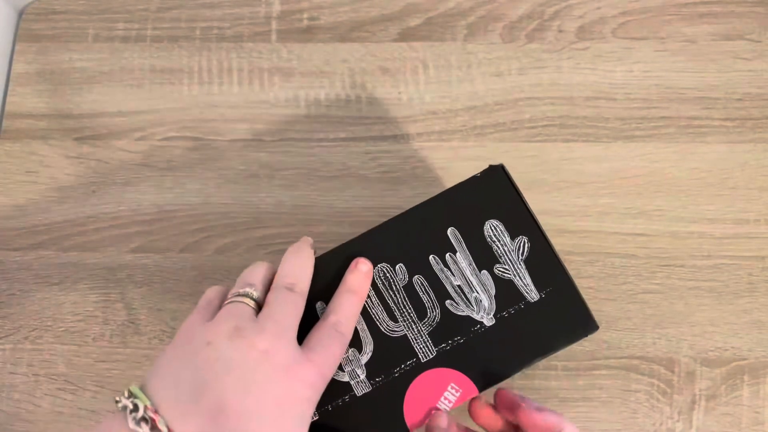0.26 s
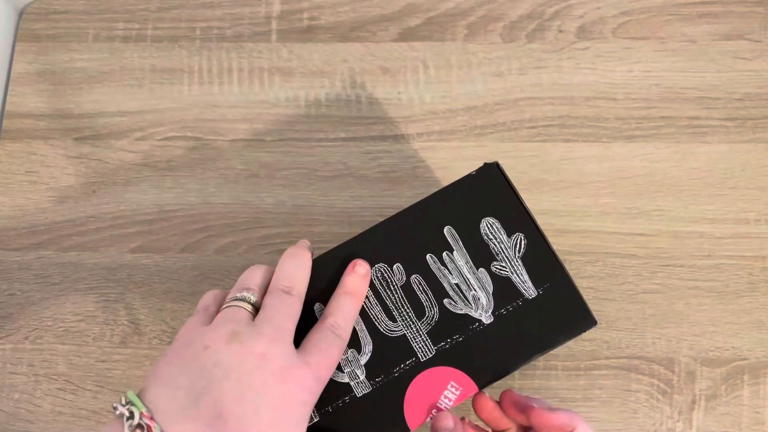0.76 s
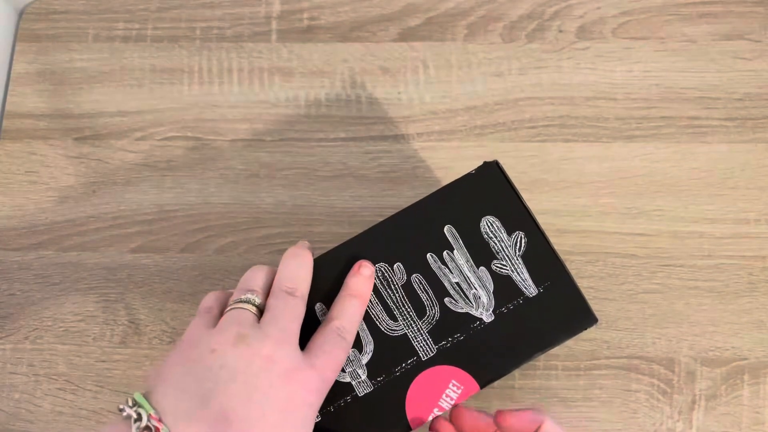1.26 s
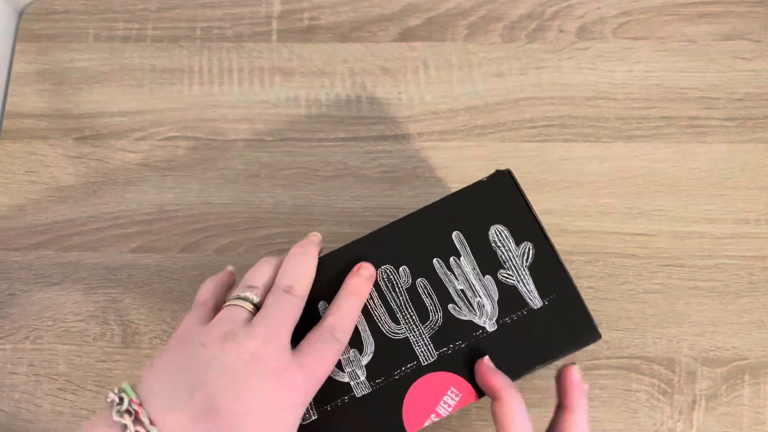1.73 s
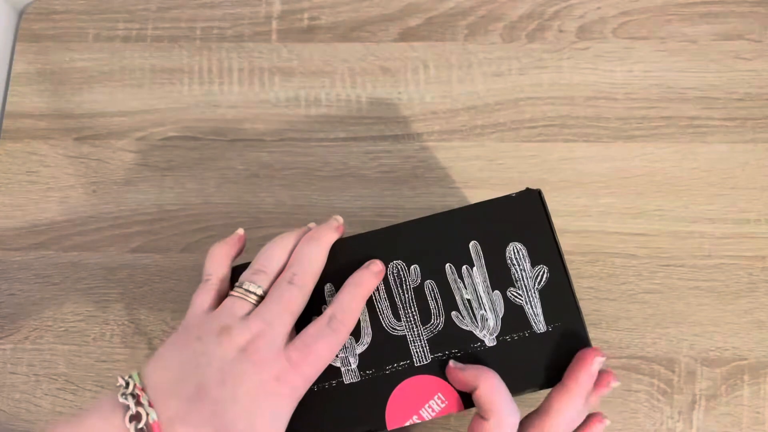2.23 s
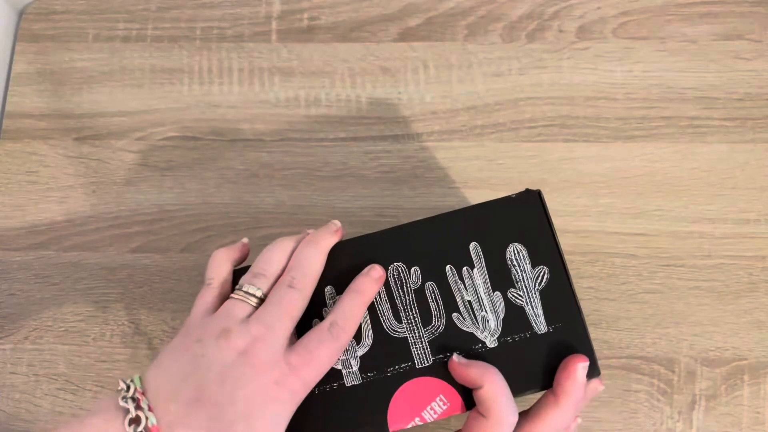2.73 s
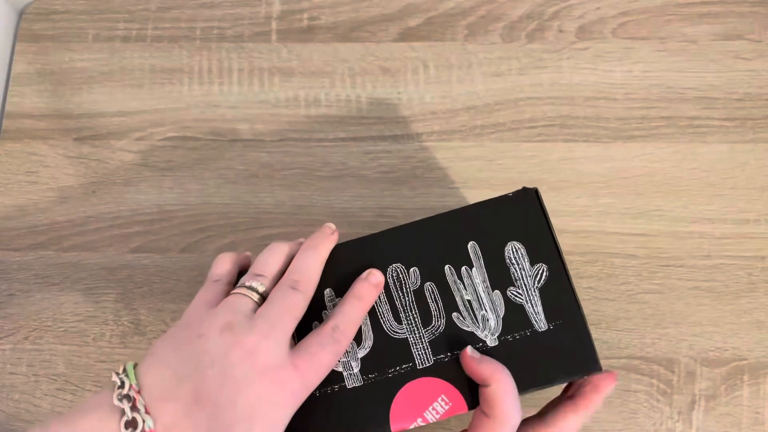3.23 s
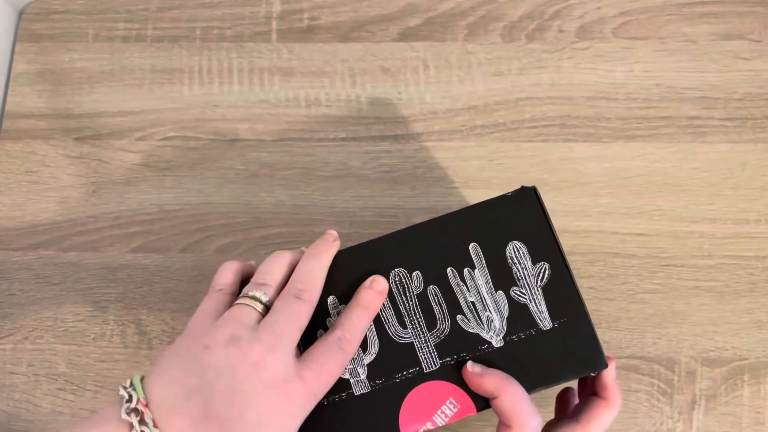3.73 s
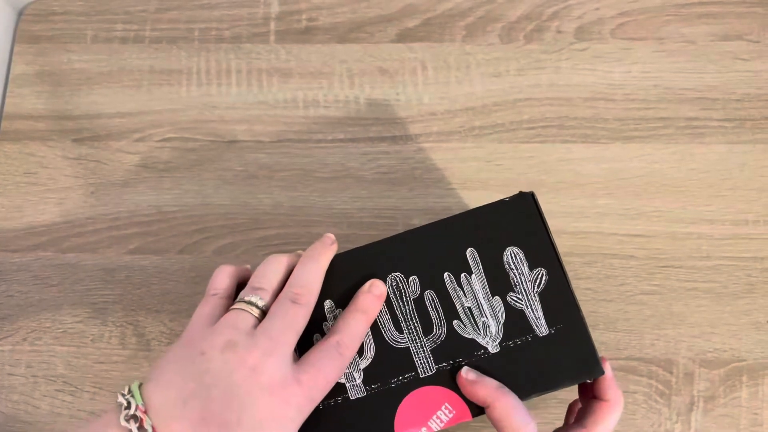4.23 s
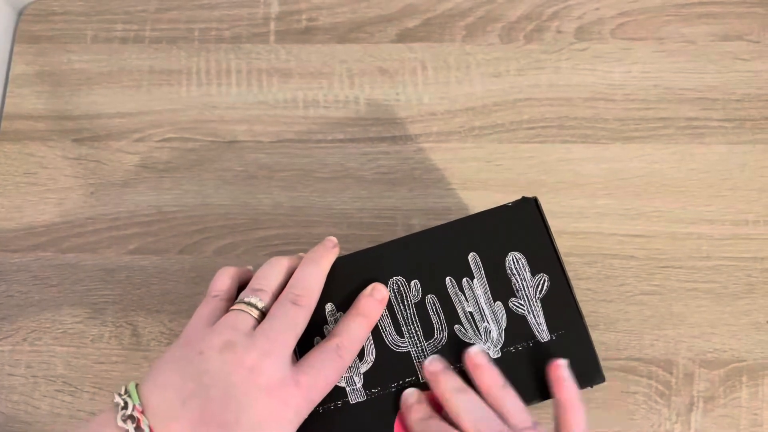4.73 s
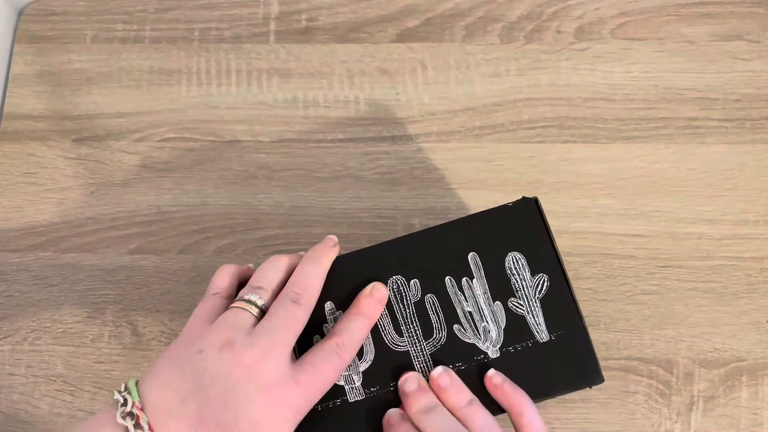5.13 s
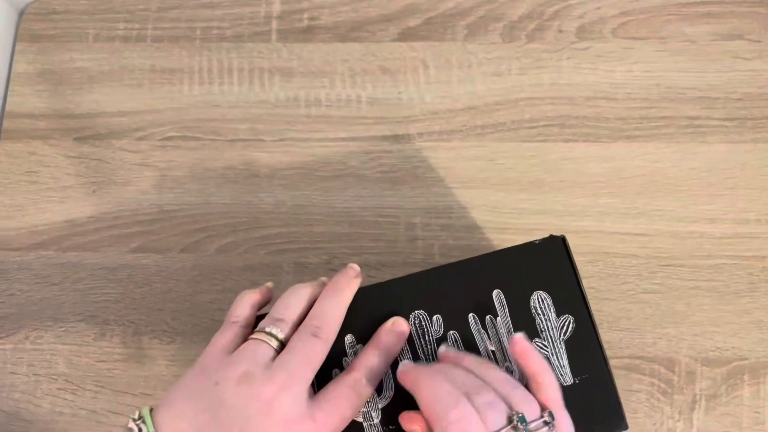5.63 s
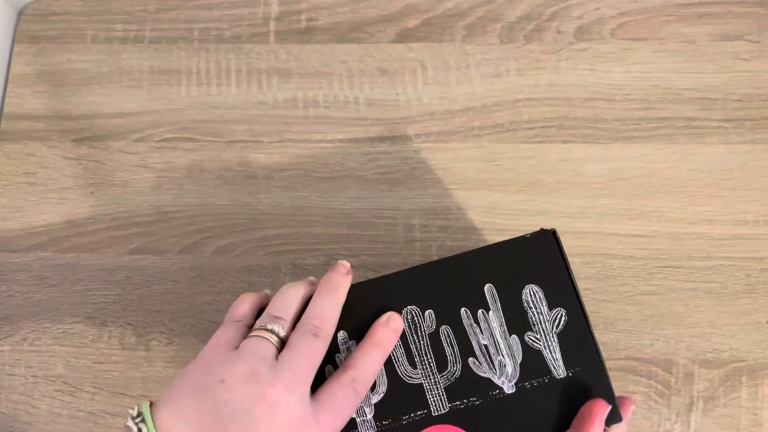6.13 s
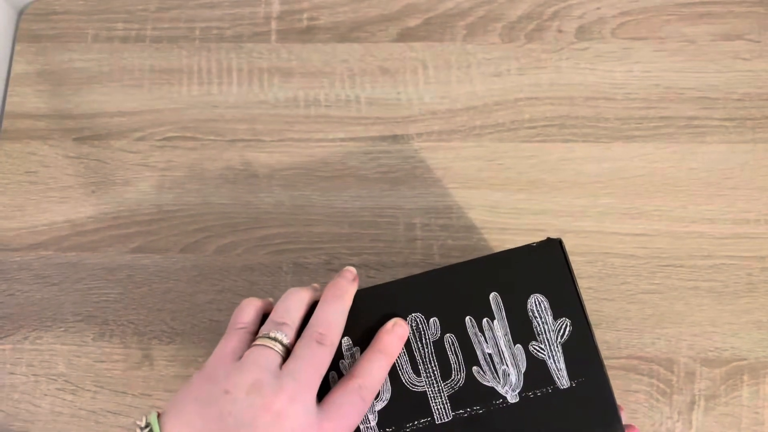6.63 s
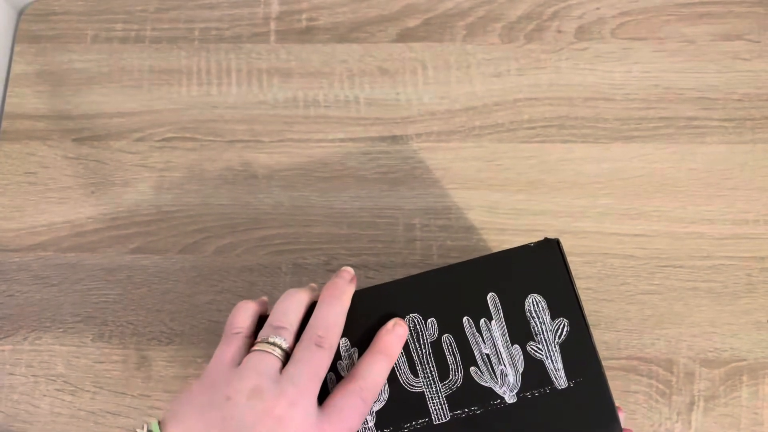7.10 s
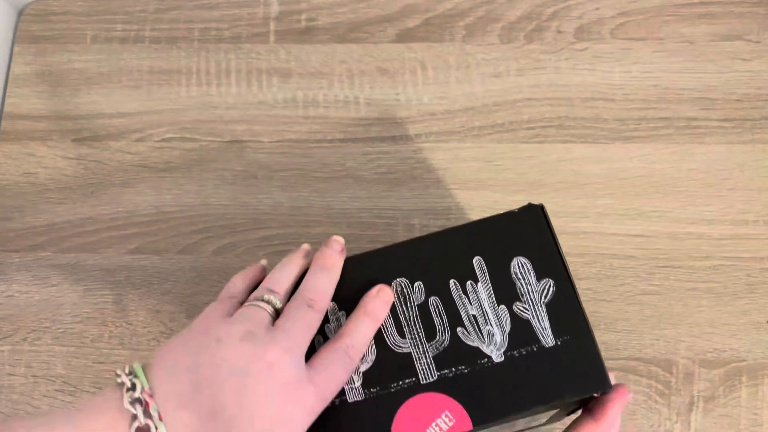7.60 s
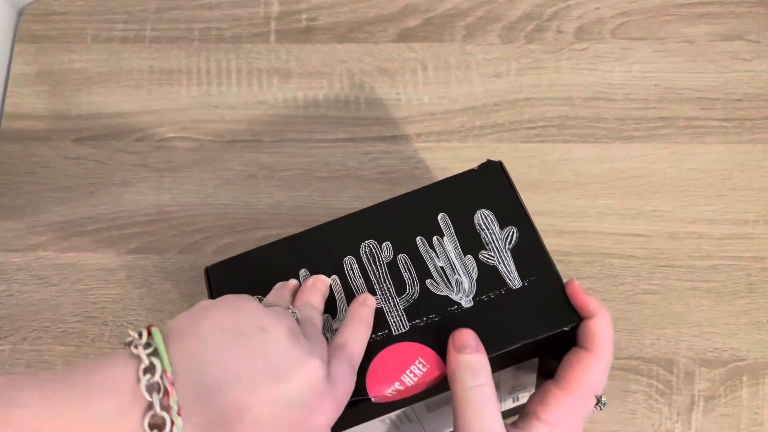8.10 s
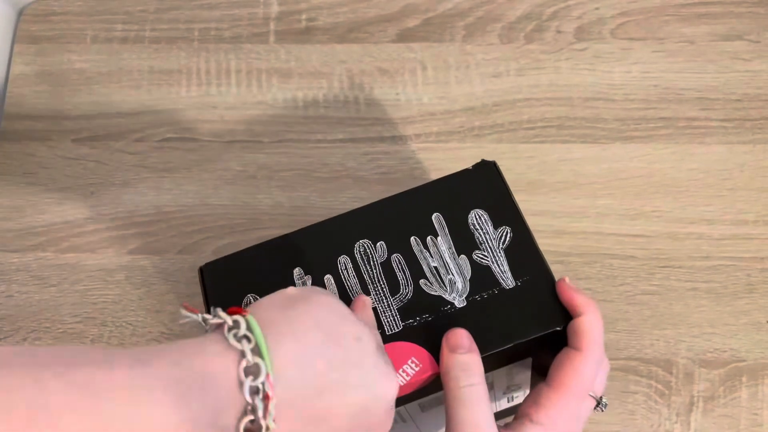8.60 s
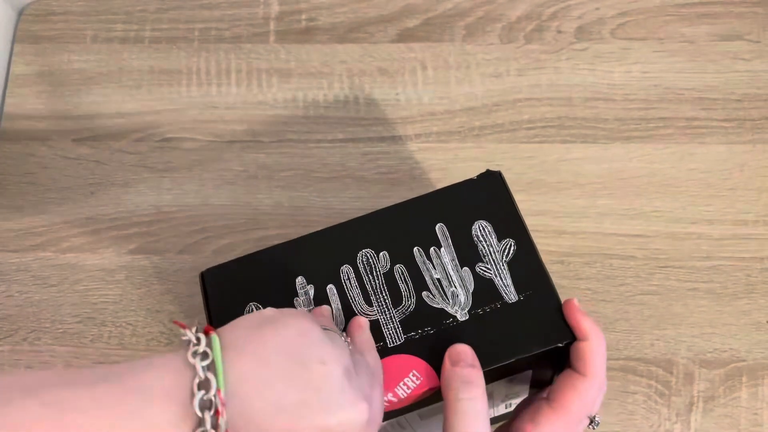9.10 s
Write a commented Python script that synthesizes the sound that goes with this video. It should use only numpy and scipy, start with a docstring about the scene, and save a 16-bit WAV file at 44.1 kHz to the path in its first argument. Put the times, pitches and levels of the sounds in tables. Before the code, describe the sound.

Close, dry nail ticks and skin rubs on a small card box on a table, one hard knock, then quieter fumbling and renewed picking.

```python
"""Fingernails pick at a sticker on a hollow cardboard box, on a table close below a two-port microphone.
Each slip or knock sends a chirping pulse and crackle through the card and rings the box's modes.
Skin hisses over the card, drives box and table, scrapes briefly and looses woody ticks; pushes and
drops of the box make the table top boom. Reflections and a short room tail answer.
Behind lie faint air noise and one thin steady tone."""
import sys
import numpy as np
from scipy import signal
from scipy.fft import rfft, irfft, next_fast_len
from scipy.io import wavfile
from scipy.ndimage import uniform_filter1d, map_coordinates

SR = 44100
rng = np.random.default_rng(int(sys.argv[2]) if len(sys.argv) > 2 else 0)


def bounce(signal):
    """Save signal as a 16-bit WAV file at the path given by the first command-line argument."""
    frames = np.transpose(np.atleast_2d(signal))
    limited = np.clip(frames, -1, 1)
    pcm = np.round(limited * 32767).astype(np.int16)
    wavfile.write(sys.argv[1], SR, pcm)


N = 412335

# nail slips on the card and knocks of the box: (time [s], snap reference level [dB], then relative to it:
# knock of the box [dB], upper ring of the box [dB], brightness [dB])
NAIL_SLIPS_AND_KNOCKS = [(0.9713, -39, -10.5, -19, -5), (1.147, -46.5, 2.5, -8, -12.5),
                         (1.164, -59, 6, -1, -25), (1.178, -57, 9.5, 0, -25), (1.3149, -38, -30, -29, -11),
                         (1.392, -60, -11, -13, -6), (1.415, -57, -6, -19, -4), (1.5601, -43, -8, -10, -21),
                         (1.5837, -45, -7, -7, -25), (1.915, -47.5, -2, -10, -12),
                         (2.0036, -50.5, -14, -23, -5), (2.0486, -41, -3.5, -17, -12.5),
                         (2.1087, -53.5, 7.5, 7.5, -20), (2.1778, -57.5, 12, -4, -7.5),
                         (2.3374, -47, -17, -17, -10), (2.354, -51, -5, 0, -25),
                         (2.3652, -46, -13, -6, -25), (2.392, -55, -8, 0, -22), (2.418, -53, -9, -2, -27),
                         (2.4071, -44.5, 2.5, -3, -26), (2.438, -45, -2, 0, -16), (2.485, -49, 1, -1, -18),
                         (2.501, -55.5, -3, -10, -8.5), (2.55, -56, -11, -19, -8),
                         (2.6196, -46, 8, -2, -13), (2.6369, -40, -3, -12, -10),
                         (2.675, -49.5, -5, -5, -18), (2.7275, -34, -12, -10.5, -25),
                         (2.7546, -35.5, -4.5, -12, -19), (2.7628, -39.5, -6, -6, -18),
                         (2.797, -32.5, -9, -13, -18.5), (2.824, -39, -6, -15, -17),
                         (2.830, -35, -6, -18, -15.5), (2.8566, -42, -18, -12, -13),
                         (2.8853, -39.5, -6, -23, -13.5), (2.9273, -46, 0, -11, -8),
                         (2.9485, -38.5, 5, -4, -19), (2.9895, -43, 9, 0, -19),
                         (3.0631, -45.5, 4.5, 0, -30), (3.122, -37.5, -9, -10, -8),
                         (3.141, -38.5, -3, -12, -25), (3.2185, -44, 11.5, 2.5, -20),
                         (3.2872, -35.5, -1.5, -8, -20), (3.4099, -29, -3, -3.5, -25),
                         (3.4394, -27, -6, -7.5, -21), (3.466, -22.5, -7, -8.5, -22.5),
                         (3.488, -25.5, -7, -3, -17), (3.5067, -22, -14, -6.5, -21.5),
                         (3.5392, -22.5, -6, -7.5, -21.5), (3.5987, -21, -8, -8.5, -19.5),
                         (3.687, -21, -6.5, -6, -17.5), (3.83, -27, -1.5, -3, -16),
                         (3.8629, -32.5, -1.5, -1, -16), (3.9066, -26, -9.5, -4.5, -19.5),
                         (3.974, -42, -2, 1, -26), (4.0082, -29, -4, -4, -16), (4.127, -60, 7, 4, -36),
                         (4.2157, -31, -9, -8, -18.5), (4.239, -31, -4.5, -5, -22),
                         (4.3826, -33.5, -11, -4, -21), (4.4452, -46.5, 10.5, -4, -10.5),
                         (4.578, -34.5, -12, -16, -22), (4.7116, -45.5, -0.5, -12, -17),
                         (4.797, -57.5, 14, 5, -23), (4.8428, -22.5, -17.5, -17.5, -25.5),
                         (4.9178, -26.5, -7.5, -9, -23), (4.954, -32, -10, -4, -21),
                         (4.9821, -19.5, -11.5, -17, -15.5), (5.0566, -33, -6.5, -18, -14),
                         (5.104, -52.5, 3, -13, -25), (5.1766, -38.5, -4, -7, -18.5),
                         (5.2003, -23, -21, -12.5, -19), (5.235, -15.5, -8.5, -14, -11.5),
                         (5.2905, -5, -7, -7.5, -23.5), (5.698, -54, -18, -14, -4),
                         (5.7202, -40, -8.5, -13, -16), (5.7466, -45, -13.5, -18, -6.5),
                         (5.8415, -35, -5, -14, -12), (5.9346, -47.5, -2, -11.5, -28.5),
                         (6.0215, -40.5, 1.5, -8.5, -19), (6.058, -37, -11, -27, -17),
                         (6.0908, -43, -2, -5, -11), (6.119, -51, 2, 1, -16), (6.1476, -51, 9, 4, -14),
                         (6.1702, -47.5, 2, -6, -15), (6.217, -46.5, 1, 3, -25), (6.2338, -49, 9, 5, -20),
                         (6.3105, -39, -1, -7, -20.5), (6.387, -40.5, 3.5, -3.5, -26),
                         (6.4016, -47, 8, 3, -16), (6.4158, -45, 7, 4, -20), (6.4285, -43, 11, 1, -24),
                         (6.445, -40.5, -3, 4, -21), (6.464, -29.5, -5, -1.5, -21),
                         (6.4825, -25.5, -8, -11, -20), (6.5087, -35, -0.5, 0, -17.5),
                         (6.541, -26.5, -4, -11, -20), (6.5837, -43, 0, -2, -30), (6.6003, -38, 4, -1, -20),
                         (6.6272, -42, 5, 4, -18), (6.6519, -40, 8.5, 4, -23.5),
                         (6.777, -47.5, 7, 4, -13.5), (6.794, -45.5, 8.5, -11, -23),
                         (6.8125, -41.5, 4.5, -1.5, -17.5), (6.836, -49.5, 11.5, 2.5, -19),
                         (6.9153, -63.5, 15, -2, -15), (6.9732, -30, -13.5, -9, -31.5),
                         (7.3027, -39.5, -1, -8.5, -10.5), (7.4434, -45.5, -18, -13, -8.5),
                         (7.4639, -32.5, -14, -10.5, -14.5), (7.5212, -44, 4.5, -2.5, -14),
                         (7.8239, -35, 2, 3, -14), (7.893, -32, 5.5, 3.5, -16.5),
                         (7.9364, -32, -1.5, -1, -16), (8.1549, -41.5, 13, 8.5, -16),
                         (8.1827, -34.5, 2, 0.5, -21), (8.2032, -32, 7.5, 3, -16),
                         (8.268, -41, -8, -5, -17), (8.378, -24.5, -4.5, -12, -23),
                         (8.4579, -32.5, 3.5, -11, -22.5), (8.5081, -21.5, -6.5, -12.5, -26),
                         (8.5406, -31, -2.5, -3.5, -22), (8.6467, -49.5, 13.5, 5, -34),
                         (8.6709, -40.5, -3, 5, -27), (8.7047, -28.5, -2.5, 1.5, -31),
                         (8.735, -22.5, -10, -4.5, -27), (8.7613, -22, -8, -4.5, -24),
                         (8.7862, -22, -10, -8.5, -23.5), (8.8125, -23, -8.5, -3.5, -21),
                         (8.8644, -20.5, -10, -5, -21), (8.9186, -20.5, -8, -7, -21.5),
                         (8.9914, -18, -12.5, -11.5, -25), (8.9987, -14, -13.5, -14.5, -4.5),
                         (9.0444, -19.5, -12.5, -8, -23), (9.0946, -37, -15, -15, -22),
                         (9.1477, -29, -24, -25, -24), (9.1681, -19.5, -12.5, -7.5, -27),
                         (9.1962, -40.5, -7.5, -5.5, -11), (9.3114, -35.5, -5, 2, -15),
                         (9.3444, -30.5, -14, -4, -18.5)]
# modes of the hollow box and of the table top: (frequency [Hz], level [dB], 60 dB decay time [s])
BOX_MODES = [(149, 5.5, 0.1), (223, 3, 0.077), (305.7, 0, 0.082), (355, 0.5, 0.16), (455.3, 0.5, 0.072),
             (549.6, -1.5, 0.08), (669.2, -3.5, 0.077), (794, -4.5, 0.09), (937, -14, 0.022),
             (1147, -11, 0.043), (1302, -10.5, 0.02), (1483, -25.5, 0.08), (2000, -16.5, 0.025),
             (2750, -22, 0.022)]
TABLE_MODES = [(52.96, 0.5, 0.74), (64.14, 1.5, .55), (112.3, -1.5, 0.38), (147, 1, 0.17), (176.4, 0, 0.17),
               (201, -7, 0.1), (350.5, 0, 0.2)]
# colour of the snap, its middle and top registers, and the bending pulse: (frequency [Hz], level [dB])
SNAP_COLOUR = [(500, -37.5), (1200, 5.5), (2000, 0), (3000, -1), (4200, -11), (6000, -29.5)]
SNAP_MID_COLOUR = [(2200, -49.5), (3400, -1.5), (4200, 2.5), (5000, -1), (7000, -3.5), (9000, -1),
                   (11000, -16), (13000, -35.5)]
SNAP_TOP_COLOUR = [(8000, -38.5), (10500, 3), (13500, 1.5), (15000, -7), (16500, -14.5)]
BENDING_COLOUR = [(250, -39), (450, 5), (750, -1), (1200, -11), (2000, -18.5), (3200, -33), (5000, -42)]
TICK_DB, RASP_DB = 13, 4  # offsets of the clean and the noisy part of the snap
THUD_DB, THUD_GROWS = -11.5, 0.82  # lowest box modes: offset, dB per dB of knock
TOP_DB, TOP_GROWS = 5, 1.7  # top treble: offset, dB per dB of brightness
PHASE_SCATTER = 0.45  # radians, from blow to blow

# ticks a second, level over the drone of the strokes [dB]
CRACKLE_RATE, CRACKLE_DB = 180, -6
# range of tick sizes [dB], lower and upper corners of their band [Hz]
CRACKLE_SPREAD_DB, CRACKLE_LOW_HZ, CRACKLE_HIGH_HZ = 16, 900, 2600

# strokes of skin over the card: (start [s], length [s], hiss [dB], fine treble over the hiss [dB],
# drone of the box [dB])
SKIN_STROKES = [(-.1, 0.49, -62.5, -5.5, -57), (1.282, 0.36, -70.5, -1, -95), (1.517, 0.43, -60, -5.5, -53),
                (1.852, 0.19, -66.5, -1.5, -57), (1.975, 0.21, -66.5, -1, -68),
                (2.163, 0.077, -77, -2, -63.5), (2.296, 0.22, -72, 1, -60), (2.498, 0.27, -62.5, -5, -58.5),
                (2.838, 0.7, -67.5, -11, -57.5), (3.405, .24, -78, -21, -46.5),
                (4.194, 0.17, -69.5, -3, -63), (4.346, 0.43, -62, -6, -60.5), (4.494, 0.3, -62.5, -1, -85),
                (4.826, 0.11, -59, -12, -54), (5.192, 0.16, -45.5, -19.5, -42),
                (5.285, 0.12, -46, -17.5, -38), (5.399, 0.13, -54, -6, -54), (5.454, 0.12, -67, 2, -52.5),
                (5.816, 0.25, -70.5, -3, -65), (5.993, 0.23, -63.5, -11, -71),
                (6.168, 0.18, -65.5, 0.5, -76), (6.356, 0.44, -88, -15.5, -61),
                (7.315, 0.5, -66.5, -4.5, -63), (7.56, 0.41, -56.5, -5, -60.5),
                (7.812, 0.12, -56, -7, -54.5), (7.866, 0.21, -58.5, -8, -49.5), (8, 0.27, -66.5, -5, -53.5),
                (8.134, 0.25, -61, -9, -54), (8.399, 0.43, -75, -21, -59.5), (8.667, 0.48, -68, -24, -50.5),
                (8.983, 0.18, -50, -30, -50), (9.16, .3, -81.5, -5, -75)]
RISE, FALL = 0.23, 0.7  # shares of a stroke's length spent swelling and fading
# the box resting under the hands: (time [s], drone of the box [dB], shudder of the table [dB])
HAND_PRESSURE = [(0.0, -58, -67), (0.36, -69, -58.5), (0.65, -73, -70.5), (0.95, -67.5, -61.5),
                 (1.12, -66.5, -72), (1.2, -66, -66), (1.3, -71, -57), (1.5, -64, -59.5), (1.64, -71, -51),
                 (1.78, -58, -45.5), (1.861, -66, -59.5), (2.24, -72, -59), (2.91, -59.5, -62),
                 (3.46, -64, -61), (3.64, -60.5, -55), (4.4, -66.5, -70), (5.28, -69.5, -56),
                 (5.42, -48, -61), (5.47, -82, -44), (5.58, -68, -41), (5.66, -85, -50.5),
                 (5.8, -76.5, -55.5), (5.86, -63, -59.5), (6.0, -72, -65.5), (6.22, -58, -72),
                 (6.3, -63, -66), (6.5, -57, -62), (6.72, -74, -57), (7.06, -74.5, -60),
                 (7.131, -87.5, -64), (7.2, -90, -79), (7.27, -69, -67), (7.34, -77, -63), (7.5, -74, -55),
                 (7.73, -62, -65), (7.87, -52, -45), (8.39, -55, -53.5), (8.72, -66, -53), (8.88, -72, -41),
                 (9.11, -64, -56), (9.35, -72, -64)]
# colour of the broad hiss and of its fine treble: (frequency [Hz], level [dB])
HISS_COLOUR = [(500, -23), (1000, 1), (2000, -3), (3500, -2.5), (5000, 0.5), (7000, -5), (9500, -3.5),
               (12000, -29.5)]
FINE_COLOUR = [(7500, -48), (10000, -1), (13500, 3.5), (15000, -6), (16500, -13)]

# short scrapes of nail or skin: (start [s], length [s], level [dB], strongest frequency [Hz],
# sharpness of that pitch [ratio], fine treble over the body [dB])
SCRAPES = [(0.195, 0.027, -66, 5000, 0.85, 1), (0.594, 0.15, -76, 4960, 3.3, -9),
           (0.917, 0.097, -75, 4000, 0.67, 1), (0.981, 0.13, -71.5, 3380, 0.28, -8),
           (1.138, 0.09, -72, 546, 1.6, -8), (1.299, 0.031, -51, 1770, 1.8, -37),
           (1.266, 0.093, -59.5, 1820, 1.4, -2), (1.383, 0.044, -68, 3000, 0.64, -1),
           (1.55, 0.052, -49.5, 1460, 2.2, -11), (1.891, 0.053, -58.5, 2480, 0.26, -9),
           (2.06, 0.041, -60, 630, 1.2, -30), (2.342, 0.086, -69, 1150, 3.1, -9),
           (2.564, 0.13, -57, 2980, 5.1, -12), (2.561, 0.11, -61, 6000, 2.2, -6),
           (2.895, 0.19, -62, 5300, 6, -20), (3.093, 0.06, -55.5, 4570, 1, -1),
           (3.224, 0.086, -58.5, 4070, 33, -8), (4.385, 0.035, -71, 4000, 1.5, 8),
           (4.46, 0.12, -61, 1470, 2.2, -14), (4.525, 0.093, -54, 3780, 1.9, -9),
           (4.742, 0.023, -69, 4970, 0.88, -1), (4.915, 0.0082, -35.5, 3400, 2, -14),
           (5.224, 0.019, -33.5, 7200, 1.2, -18), (5.248, 0.13, -37.5, 1810, 2, -8),
           (5.408, 0.081, -42.5, 1800, 1.9, -9), (5.476, 0.042, -55.5, 1990, 3, -3),
           (5.567, 0.077, -55.5, 1450, 13, 4.5), (5.629, 0.016, -57, 4970, 0.52, 1),
           (5.683, 0.032, -59, 4530, 0.89, 0), (5.723, 0.061, -54, 4520, 14, -6),
           (5.822, 0.037, -47, 2900, 1.2, -14), (6.324, 0.028, -63, 1950, 5, -12),
           (7.265, 0.095, -57, 3620, 1.7, -12), (7.629, 0.091, -54.5, 4400, 0.54, -3),
           (8.09, 0.05, -60, 700, 1.8, -25), (8.97, 0.022, -49, 1980, 1.3, -19),
           (9.163, 0.0077, -54, 7000, 1, 11)]
GRAIN_DB = 4  # unevenness of a scrape

# pushes and drops of the box on the table: (time [s], reference level [dB], then relative to it:
# deep boom [dB], low hum [dB], upper hum [dB], hollow ring [dB])
TABLE_BLOWS = [(0.35, -50, -2.5, 5.5, 0, -11), (1.238, -42, -6, -11, 1, -15),
               (1.553, -32.5, -11, 4, 2.5, -18), (1.566, -29.5, -2, 3, -8, -19),
               (2.042, -34.5, -12.5, -9, -8, -21), (3.485, -34, -4, 2, 6, -10),
               (3.493, -31, -20, 3.5, 1, -9), (5.235, -33.5, -5, 4, 4, -4),
               (5.293, -6, -27.5, -18, -7, -14.5), (5.483, -17, -13.5, -1.5, -8, -12.5),
               (6.399, -41.5, -25.5, -24, 0, -8), (7.304, -43, -24, -3, -8, -11.5),
               (7.692, -40, -2.5, -0.5, 0.5, -13), (7.891, -46, -1, -19, -2, -4),
               (8.19, -49, -21, -18, 0, -8), (8.917, -34.5, -21, -23.5, -5, -8)]

# first reflections: (frequency [Hz], level [dB])
REFLECTION_COLOUR = [(100, -46.5), (300, -22.5), (600, -12), (1500, -17.5), (4000, -9), (7000, -10.5),
                     (9000, -14), (11500, -26), (13000, -10), (15500, -37)]
# fading of the room: (frequency [Hz], 60 dB decay time [s])
ROOM_DECAY = [(150, 0.34), (400, 0.13), (1000, 0.15), (2800, 0.16), (7000, 0.27), (14000, 0.29)]
# strength of the room's answer: (frequency [Hz], level [dB])
ROOM_LEVEL = [(150, -21), (500, -2), (1500, -11.5), (4000, -6.5), (9000, -11), (15000, -12.5)]
# diffuse sound at the two ports: (frequency [Hz], left-right likeness [correlation, 0 to 1])
PORT_LIKENESS = [(60, 0.99), (130, 1), (300, 0.92), (700, 0.27), (2000, 0.96), (4800, 0.17), (7500, 1),
                 (10000, 1), (12500, 0.85), (15500, 0.85)]

# colour of the air noise: (frequency [Hz], level [dB])
AIR_COLOUR = [(15, -39.5), (28, -7.5), (45, 3), (65, -5.5), (82, -5.5), (122, -17.5), (160, -24),
              (350, -36), (700, -37.5), (1500, -54), (2300, -45.5), (2750, -40), (3300, -50), (7000, -52.5),
              (13000, -52.5), (16500, -86.5)]
AIR_DB = -59
HUM_HZ, HUM_DB = 861, -77  # the thin tone: centre pitch and middle level

# level difference of the ports: (frequency [Hz], left over right [dB])
PORT_LEAN = [(70, 0), (150, .8), (400, 2.2), (1200, .5), (4000, -1.2), (6500, 0)]
# phase difference of the ports: (frequency [Hz], lead of the left port [radians])
PORT_LEAD = [(250, 0), (900, -.2), (2000, .1), (4100, .55), (6000, .7), (7600, 1.9), (9500, 3.1),
             (11100, 3.2), (12400, 4.4), (14500, 5.9), (15500, 6.28)]
# microphone notch: (frequency [Hz], half width [Hz], depth [0 to 1])
MIC_NOTCH = (4815, 424, 0.59)
TOP_HZ = 16600  # nothing passes above


def picking():
    """Each slip or knock sends a pulse and crackle in three registers through the card, and strikes the box."""
    times, snap_db, knock_db, ring_db, mid_db = np.transpose(NAIL_SLIPS_AND_KNOCKS)
    thud_db = THUD_DB + THUD_GROWS * knock_db
    bright_db = snap_db + 18.5
    crack = flicks(snap_db + TICK_DB, SNAP_COLOUR)
    crack += snaps(snap_db + RASP_DB, SNAP_COLOUR, t60=0.014)
    crack += snaps(bright_db + mid_db, SNAP_MID_COLOUR, t60=0.014)
    crack += snaps(bright_db + TOP_DB + TOP_GROWS * mid_db, SNAP_TOP_COLOUR, t60=0.016)
    crack += flicks(snap_db + 1.07 * ring_db + 33.5, BENDING_COLOUR)
    mode_hz = np.transpose(BOX_MODES)[0]
    blows = []
    for db, thud, knock, ring in zip(snap_db, thud_db, knock_db, ring_db):
        balance = [(170, thud + 3), (300, knock - 4), (500, knock - 4),
                   (700, ring - 2), (1000, ring - 2), (1500, 0.5)]
        blows.append(db + along(balance, mode_hz))
    return crack + struck(BOX_MODES, times, blows, cycles=0.87, scatter_db=2.5)


def flicks(level_db, spectrum):
    """A slip or knock sends one bending pulse through the card; high pitches run ahead: a downward chirp."""
    pulses = np.zeros(N)
    pulses[(np.transpose(NAIL_SLIPS_AND_KNOCKS)[0] * SR).astype(int)] = amp(level_db)

    def card(hz):
        turns = 0.19 * np.sqrt(hz) - 0.001213 * hz  # the linear term moves the whole pulse earlier
        return amp(along(spectrum, hz)) * np.exp(-2j * np.pi * turns)
    return filtered(pulses, card)


def snaps(level_db, spectrum, t60):
    """A few milliseconds of crackle as the nail jumps off the sticker's edge or the box is knocked."""
    out, t = np.zeros(N + SR), np.arange(SR // 40) / SR
    envelope = amp(-60 * t / t60) * (1 - np.exp(-t / 0.002))
    for start, db in zip(np.transpose(NAIL_SLIPS_AND_KNOCKS)[0], level_db):
        burst = envelope * rng.standard_normal(len(t))
        out[round(start * SR):][:len(t)] += amp(db - 20.0) * unit(burst)
    return filtered(out[:N], lambda hz: amp(along(spectrum, hz)))


def struck(modes, times, blow_db, cycles, scatter_db):
    """Every blow rings the modes at new strengths; low modes build up later, as bending waves spread.
    blow_db holds the blow's strength on each mode, one row per blow."""
    hz, level, t60 = np.transpose(modes)[:, :, None]
    out, t = np.zeros(N + SR), np.arange(int(SR * np.max(t60))) / SR
    build_up = 1 - np.exp(-(t * hz / cycles) ** 2)
    shape = amp(level - 60 * t / t60) * build_up
    for start, db in zip(times, blow_db):
        strength, detune, phase = rng.standard_normal((3, len(modes), 1))
        swing = np.sin(2 * np.pi * hz * (1 + 0.021 * detune) * t + PHASE_SCATTER * phase)
        ringing = amp(db[:, None] + scatter_db * strength) * shape * swing
        out[round(start * SR):][:len(t)] += ringing.sum(0)
    return out[:N]


def crackle():
    """While the card is rubbed, fibres and glue let go in small, soft, woody ticks."""
    when, size, sign = rng.random((3, int(CRACKLE_RATE * N / SR)))
    heights = np.sign(sign - 0.5) * amp(CRACKLE_SPREAD_DB * size ** 2)
    ticks = np.bincount((when * N).astype(int), heights, N)

    def wood(hz):
        low_cut = hz ** 2 / (hz ** 2 + CRACKLE_LOW_HZ ** 2)
        softness = 1 / (1 + 1j * hz / CRACKLE_HIGH_HZ) ** 2
        return resonances(BOX_MODES, hz, damping=2.0) * low_cut * softness
    drone_db = np.transpose(SKIN_STROKES)[4]
    return amp(CRACKLE_DB) * stroked(drone_db) * unit(filtered(ticks, wood))


def sliding():
    """Skin drags in tiny uneven catches: they hiss; uneven rubbing also drives the box and the table."""
    hiss_db, fine_db, drone_db = np.transpose(SKIN_STROKES)[2:]
    times, *columns = np.transpose(HAND_PRESSURE)
    rest_db, shudder_db = [np.interp(np.arange(N) / SR, times, c) for c in columns]
    catches = amp(1.5 * wobble(35) + 2.5 * wobble(320)) * grit(220, size_db=-3.0)

    def rub(response):
        return unit(diffuse(rng.standard_normal((2, N)), response))
    hiss = stroked(hiss_db) * catches * rub(lambda hz: amp(along(HISS_COLOUR, hz)))
    fine = stroked(hiss_db + fine_db) * catches * rub(lambda hz: amp(along(FINE_COLOUR, hz)))
    drone_gain = (amp(rest_db) + stroked(drone_db)) * amp(4.4 * wobble(25))
    drone = drone_gain * rub(lambda hz: resonances(BOX_MODES, hz, damping=1.3))
    # the table shudders without its highest mode
    table = rub(lambda hz: resonances(TABLE_MODES[:-1], hz, damping=1.2))
    shudder = amp(shudder_db + 3.7 * wobble(6.2)) * table
    return hiss + fine + drone + shudder


def stroked(level_db):
    """Gain over time: every stroke swells, holds and fades."""
    out = np.zeros(N + 2 * SR)  # a second of margin lets a stroke start before zero
    for (start, length, *_), db in zip(SKIN_STROKES, level_db):
        u = np.linspace(0, 1, int(length * SR))
        ramp = np.clip(np.minimum(u / RISE, (1 - u) / FALL), 0, 1)
        out[SR + round(start * SR):][:len(u)] += amp(db) * np.sin(np.pi / 2 * ramp) ** 2
    return out[SR:][:N]


def grit(rate, size_db):
    """Gain that jumps for a few milliseconds whenever skin or nail catches on a fibre."""
    when, size = rng.random((2, int(rate * N / SR)))
    jumps = np.bincount((when * N).astype(int), amp(-size_db * np.log(1 - size)), N)
    decay = amp(-60 * np.arange(SR // 50) / SR / 0.002)
    return unit(1 + signal.fftconvolve(jumps, decay)[:N])


def resonances(modes, hz, damping):
    """Response of a body driven without pause; the damping factor scales every mode's width."""
    total = 0
    for k, (centre_hz, db, t60) in enumerate(modes):
        width = damping * np.log(1000) / (np.pi * t60)
        loss = 1j * hz * width
        total = total + (-1) ** k * amp(db) * loss / (centre_hz ** 2 - hz * hz + loss)
    return total


def scuffing():
    """Each scrape is a burst of dense grains around its own pitch, with fine treble on top."""
    out = np.zeros(N)
    for start, length, db, centre_hz, sharp, fine_db in SCRAPES:
        n = int(length * SR)
        hz, luck = np.fft.rfftfreq(n, 1 / SR), rng.standard_normal((3, SR // 2))[:, :n]
        unevenness = unit(uniform_filter1d(luck[2], size=90))
        grains = luck[:2] * amp(GRAIN_DB * unevenness)
        detuning = sharp * (hz / centre_hz - centre_hz / (hz + 1))
        peak = 1 / (1 + detuning ** 2) + 0.18 * amp(along(HISS_COLOUR, hz))
        coloured = irfft(rfft(grains) * [peak, amp(along(FINE_COLOUR, hz))], n)
        body, fine = (unit(v) for v in coloured)
        fade = signal.windows.tukey(n, 0.65)
        out[round(start * SR):][:n] += amp(db) * fade * (body + amp(fine_db) * fine)
    return out


def thumps():
    """The table top booms under the box; a soft, wide contact starts it gently."""
    times, peak_db, *over_db = np.transpose(TABLE_BLOWS)
    mode_hz = np.transpose(TABLE_MODES)[0]
    blows = []
    for db, boom, hum, upper, hollow in zip(peak_db, *over_db):
        balance = [(70, boom + 3), (112, hum), (146, -0.5), (175, upper), (220, upper), (340, hollow)]
        blows.append(db + along(balance, mode_hz))
    return struck(TABLE_MODES, times, blows, cycles=0.8, scatter_db=1.5)


def early(x):
    """First reflections come from the sides and reach the two ports in opposite phase."""
    decay = amp(-60 * np.arange(1600) / SR / 0.05)
    taps = unit(rng.standard_normal(1600) * decay) / 40  # unit energy in all
    delayed = signal.fftconvolve(x, np.pad(taps, (120, 0)))[:N]
    side = filtered(delayed, lambda hz: amp(along(REFLECTION_COLOUR, hz)))
    return np.array([side, -side])


def room(x):
    """The answer's power at each frequency is fed by the sound and dies at its own speed."""
    hz, t, z = signal.stft(np.pad(x, (200, 0))[:N], SR, nperseg=256)
    keep = amp(-120 * (t[1] - t[0]) / along(ROOM_DECAY, hz))  # share of power left after one frame
    power = np.array([signal.lfilter([1 - k], [1, -k], p) for k, p in zip(keep, np.abs(z) ** 2)])
    chance = rng.standard_normal((2, *z.shape)) + 1j * rng.standard_normal((2, *z.shape))
    tail = signal.istft(chance * np.sqrt(power), SR, nperseg=256)[1][:, :N]
    return diffuse(tail, lambda hz: amp(along(ROOM_LEVEL, hz)))


def diffuse(pair, gain):
    """Two unrelated signals mixed to a left-right pair of the given likeness at the ports."""
    def mid_side(hz):
        turn = np.arccos(np.clip(along(PORT_LIKENESS, hz), -1, 1)) / 2
        return gain(hz) * [np.cos(turn), np.sin(turn)]
    mid, side = filtered(pair, mid_side)
    return np.array([mid + side, mid - side])


def background():
    """Faint coloured air noise, and one thin tone wavering slightly in phase and level."""
    air = unit(diffuse(rng.standard_normal((2, N)), lambda hz: amp(along(AIR_COLOUR, hz))))
    phase = 2 * np.pi * (HUM_HZ * np.arange(N) / SR) + 0.29 * wobble(23)
    tone = amp(HUM_DB + 1.2 * wobble(6.1)) * np.sin([phase + 0.5, phase - 0.5])
    return amp(AIR_DB) * air + tone


def amp(db):
    """Amplitude factor of a level in dB."""
    return 10 ** (np.asarray(db) / 20)


def unit(x):
    """x scaled to an rms of one."""
    return x / np.sqrt(np.mean(x ** 2) + 1e-20)


def along(points, hz):
    """Value at hz between (frequency [Hz], value) points, on a log frequency axis."""
    f, v = np.transpose(points)
    return np.interp(np.log(hz + 1), np.log(f + 1), v)


def wobble(rate):
    """A smooth random curve, rate knots a second."""
    knots = rng.standard_normal(int(N * rate / SR) + 4)
    return map_coordinates(knots, [np.arange(N) * rate / SR])


def filtered(x, response):
    """x passed through a complex response of frequency."""
    m = next_fast_len(N + SR // 2)
    return irfft(rfft(x, m) * response(np.fft.rfftfreq(m, 1 / SR)), m)[..., :N]


def scene():
    """Hands, box and table close to the microphone, with reflections, room and background."""
    picks = picking() + crackle()
    scuffs = grit(160, size_db=0.5) * scuffing()
    hits = picks + scuffs + thumps()
    # the room answers only the sound above about 330 Hz
    room_feed = filtered(picks + 0.5 * scuffs, lambda hz: hz ** 4 / (hz ** 4 + 330 ** 4))
    return hits + early(hits) + room(room_feed) + sliding() + background()


def record(dry):
    """Two ports differ in phase and slightly in level; deep bass is cut, a notch and a top limit shape treble."""
    half = np.array([[0.5], [-0.5]])  # each port takes half of the difference
    notch_hz, notch_width, notch_depth = MIC_NOTCH

    def microphone(hz):
        ports = amp(half * along(PORT_LEAN, hz)) * np.exp(1j * half * along(PORT_LEAD, hz))
        bass_cut = (1j * hz / 40) ** 2 / (1 + 1.4j * hz / 40 - (hz / 40) ** 2)
        notch = 1 - notch_depth / (1 + ((hz - notch_hz) / notch_width) ** 2)
        top = np.clip((TOP_HZ - hz) / 500, 0, 1) ** 2
        return ports * bass_cut ** 2 * notch * top  # the bass cut acts twice
    return filtered(dry, microphone)


dry = scene()
out = record(dry)
bounce(out)
```